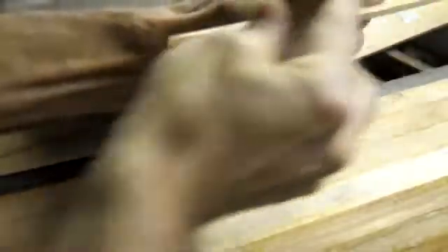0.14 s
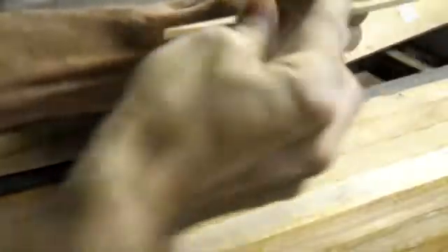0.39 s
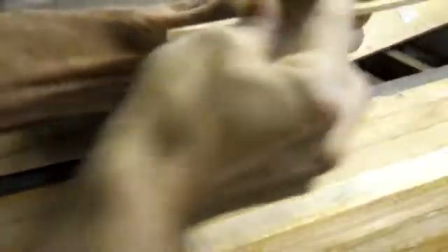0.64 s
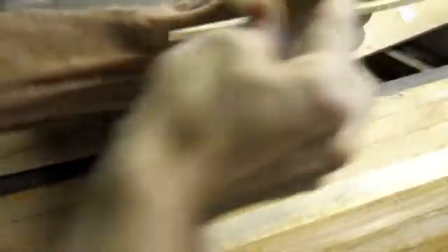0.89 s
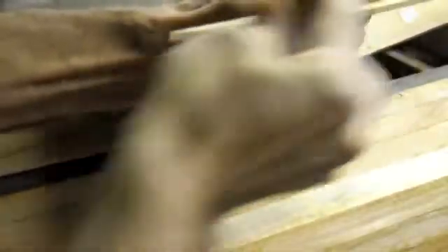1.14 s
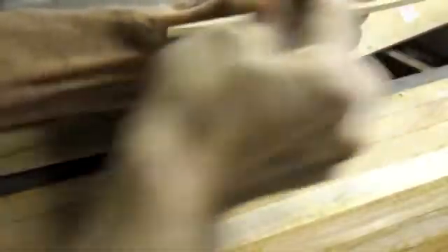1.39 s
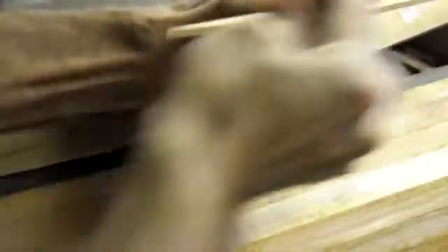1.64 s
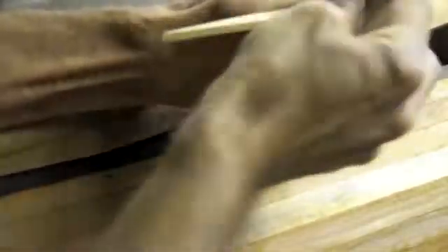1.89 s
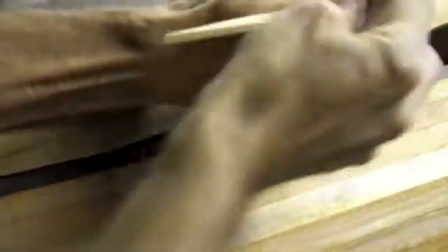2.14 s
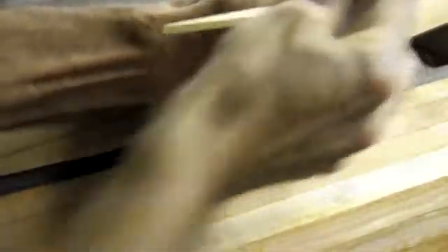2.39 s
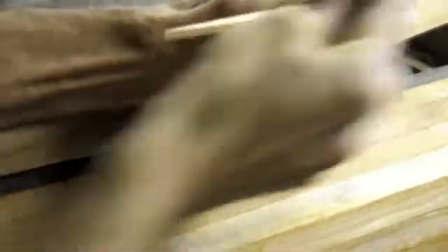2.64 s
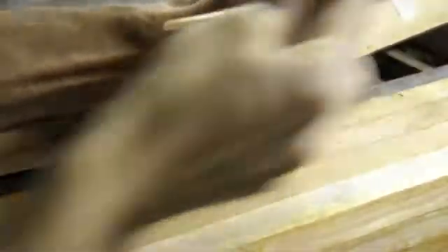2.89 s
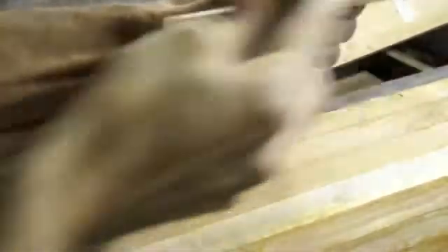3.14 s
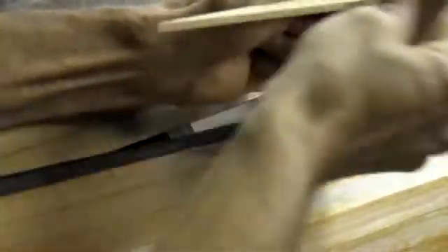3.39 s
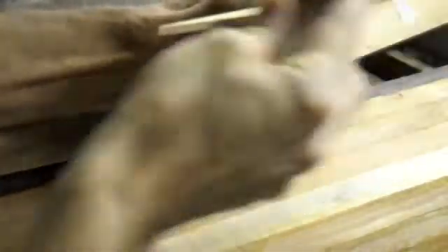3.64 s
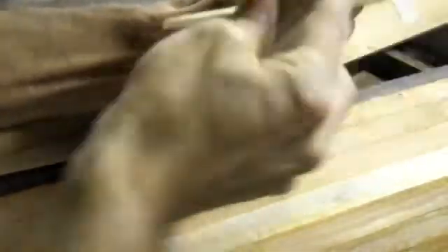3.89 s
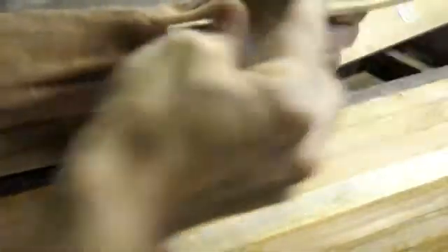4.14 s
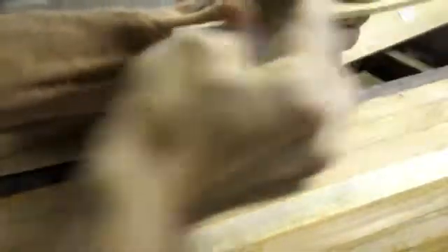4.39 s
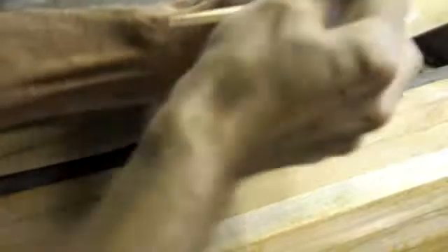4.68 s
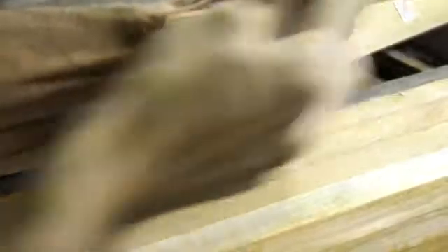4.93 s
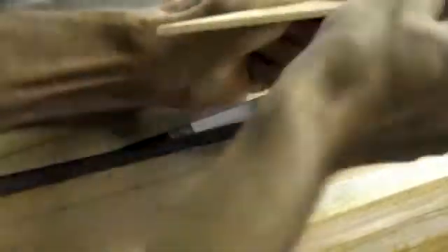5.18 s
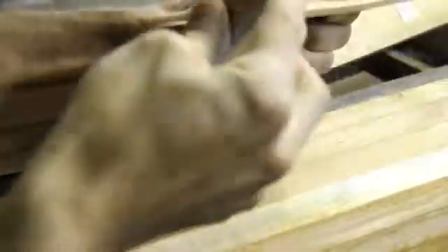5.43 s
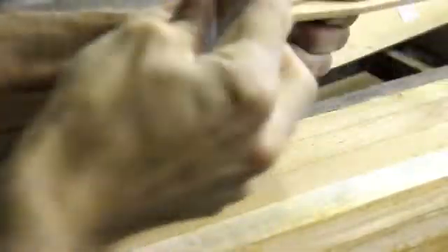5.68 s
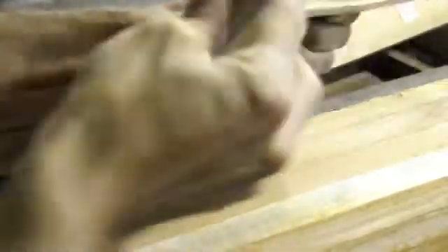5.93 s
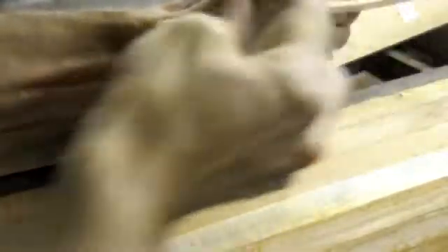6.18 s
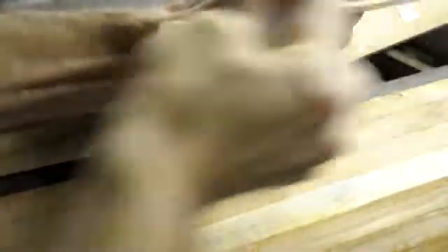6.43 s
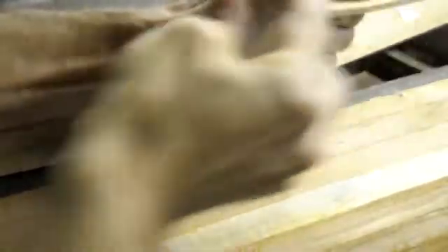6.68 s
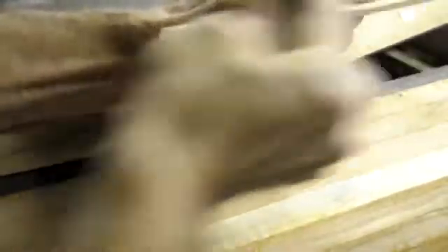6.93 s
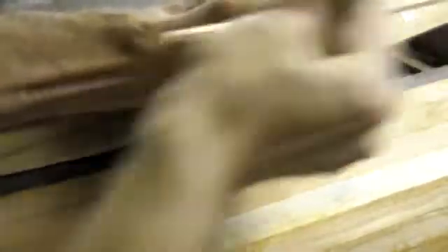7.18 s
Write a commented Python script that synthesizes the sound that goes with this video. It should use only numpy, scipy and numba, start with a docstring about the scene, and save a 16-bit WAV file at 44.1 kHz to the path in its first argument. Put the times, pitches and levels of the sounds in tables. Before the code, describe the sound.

Fast dry hand sanding on wood, about nine gritty strokes a second, with brief gaps and small hollow bumps in a workshop.

```python
"""Sandpaper on a wooden strip

In a workshop, folded sandpaper rubs to and fro along a thin strip held over a slatted bench.
Random grit catches make a hiss that follows hand speed and drive resonances of the strip and the boards.
Bumps ring the bench, soft wrist thumps ring one low mode, and the paper lands or bites as fading scuffs.
Decaying noise gives the room's echoes; coloured noise and a mains hum lie beneath, in a narrow microphone channel.
"""
import sys
import numpy as np
from scipy import signal
from scipy.fft import rfft, irfft
from scipy.io import wavfile
from scipy.ndimage import uniform_filter1d
from numba import njit

SR = 44100
rng = np.random.default_rng(int(sys.argv[2]) if len(sys.argv) > 2 else 0)


def store_pcm(level_fs):
    """Save levels as 16-bit WAV."""
    pcm = np.round(np.clip(level_fs, -1, 1) * 32767).astype(np.int16)
    wavfile.write(sys.argv[1], SR, np.atleast_2d(pcm).T)


def boost_factor(decibels):
    """Convert a level in decibels to a linear amplitude factor."""
    exponent = np.asarray(decibels, float) / 20
    return 10 ** exponent


N = 321930
TIME = np.arange(N) / SR


def rms_one(x):
    """Scale to an rms of 1."""
    return x / np.sqrt(np.mean(x ** 2) + 1e-20)


def cut(x, hz, kind):
    """Second-order low or high pass."""
    return signal.sosfilt(signal.butter(2, hz, kind, fs=SR, output="sos"), x)


def coloured(x, points):
    """Causal minimum-phase filter following a (f/Hz, level/dB) curve on a log axis."""
    curve_hz, curve_db = np.transpose(points)
    hz = np.linspace(0, SR / 2, 2049)
    db = np.interp(np.log(hz + 1), np.log(curve_hz), curve_db)
    cepstrum = irfft(db * np.log(10) / 20)
    cepstrum[1:2048] *= 2      # folding the cepstrum forward makes the response causal
    cepstrum[2049:] = 0
    response = irfft(np.exp(rfft(cepstrum)))
    return signal.fftconvolve(x, response)[:N]


def drift(rate):
    """Random wandering of rms 1: noise through two equal low passes at rate Hz."""
    r = np.exp(-2 * np.pi * rate / SR)
    wander = signal.lfilter([1], [1, -2 * r, r * r], rng.standard_normal(N + SR))
    return rms_one(wander[SR:])      # the first second lets the filter settle


def ring(force, hz, t60):
    """A damped mode: a unit click sets a sine of height 1 ringing."""
    r, w = boost_factor(-60 / (t60 * SR)), 2 * np.pi * hz / SR
    return signal.lfilter([0, np.sin(w)], [1, -2 * r * np.cos(w), r * r], force + 1e-18)


@njit
def gliding(x, turn, r):
    """Resonance whose centre moves sample by sample."""
    y = np.zeros_like(x)
    for i in range(2, len(x)):
        drive = (1 - r * r) / 2 * (x[i] - x[i - 2])
        y[i] = drive + r * turn[i] * y[i - 1] - r * r * y[i - 2]
    return y


# How bright the rubbed grit is before it is split into hiss, rumble and rings: f/Hz, level/dB
GRIT_COLOUR = [(88, -60), (150, -25.5), (292, -16), (361, -7), (551, -14.5), (870, -6), (943, -7),
               (1040, -6.5), (2230, -6), (3250, 0), (3640, 0.5), (5120, -4), (6230, -13), (7330, -15.5),
               (9530, -68), (16100, -120)]


def sanding():
    """One grain train feeds hiss, rumble, the strip's three rings and the bench."""
    middle = np.mean(np.array(STROKES)[:, :2], axis=1)
    *curves, stroke_rumble_db = stroke_colour(middle)
    ring_hz, ring_db, upper_hz, upper_db, shake_db = (np.interp(TIME, middle, c) for c in curves)
    speed, rumble_db = hand_speed(stroke_rumble_db)

    grains = grit(per_s=16000, spread_db=2.5)
    rasp = coloured(grains, GRIT_COLOUR)
    rumble_top_hz = 1750
    hiss = boost_factor(-6.5) * rms_one(cut(rasp, rumble_top_hz, "high"))
    rumble = boost_factor(rumble_db) * rms_one(cut(rasp, rumble_top_hz, "low"))

    usual_speed = uniform_filter1d(speed, size=SR // 8)
    pace = (speed / (usual_speed + 0.0011)) ** 0.77      # the ring sings out at top speed
    main_ring = pace * boost_factor(ring_db) * strip_ring(rasp, ring_hz, width_hz=910)
    upper_ring = boost_factor(upper_db) * strip_ring(rasp, upper_hz, width_hz=550)
    low_ring = boost_factor(-23.5 + 5.5 * drift(16)) * strip_ring(rasp, 1584, width_hz=600)
    strip = main_ring - upper_ring - low_ring
    return speed * (hiss - rumble + strip) + bench(grains * speed * boost_factor(shake_db))


def grit(per_s, spread_db):
    """Grains catch and let go at random, in clumps as the paper chatters."""
    sizes = boost_factor(spread_db * np.minimum(rng.exponential(1, N), 5)) * rng.choice([-1, 1], N)
    catches = rng.random(N) < per_s / SR
    chatter = boost_factor(1.1 * drift(160))
    return rms_one(sizes * catches * chatter)


# Each rub of the hand: start t/s, end t/s, top hand-speed level/dB
STROKES = [(-0.026, 0.102, -24.5), (0.094, 0.226, -21), (0.242, 0.35, -19), (0.363, 0.479, -17.5),
           (0.503, 0.612, -18), (0.611, 0.727, -18.5), (0.741, 0.874, -18), (1.127, 1.23, -26.5),
           (1.227, 1.345, -26), (1.369, 1.469, -24), (1.478, 1.581, -22.5), (1.595, 1.692, -22.5),
           (1.702, 1.813, -21), (1.823, 1.933, -22.5), (1.93, 2.042, -21), (2.053, 2.159, -23.0),
           (2.164, 2.268, -21), (2.279, 2.399, -24), (2.4, 2.509, -20.5), (2.527, 2.624, -22.5),
           (2.63, 2.756, -24), (2.752, 2.883, -24), (2.877, 3.001, -21), (3.008, 3.126, -22.5),
           (3.12, 3.237, -21), (3.263, 3.347, -20), (3.364, 3.478, -21), (3.485, 3.597, -22.5),
           (3.611, 3.712, -19), (3.728, 3.836, -22), (3.834, 3.949, -19.5), (3.954, 4.063, -21),
           (4.077, 4.175, -18.5), (4.204, 4.297, -22), (4.302, 4.418, -21.5), (4.421, 4.539, -23.5),
           (4.536, 4.648, -21.5), (4.659, 4.761, -24), (4.757, 4.897, -20.5), (5.204, 5.353, -24),
           (5.363, 5.471, -23.5), (5.473, 5.577, -20.5), (5.594, 5.711, -23), (5.701, 5.814, -21),
           (5.826, 5.939, -23.5), (5.933, 6.048, -21.5), (6.048, 6.163, -24.5), (6.161, 6.27, -21),
           (6.271, 6.385, -24), (6.376, 6.498, -24), (6.497, 6.617, -25), (6.609, 6.746, -23),
           (7.061, 7.181, -26.5), (7.194, 7.304, -25.5)]
# The paper lands or bites at a turn:
# t/s, hand-speed level/dB, 60 dB fade t/s, wood rumble drive level/dB
TOUCHES = [(0.965, -38.5, 0.08, -7), (0.979, -50, 0.056, 4), (1.119, -30.5, 0.049, 2.5),
           (1.362, -26, 0.11, -9), (1.483, -26.5, 0.15, -5), (2.664, -23.5, 0.022, -10),
           (3.254, -17, 0.069, -12), (3.373, -31, 0.12, -4.5), (3.611, -24.5, 0.069, -9),
           (4.081, -27.5, 0.086, -7.5), (4.196, -16, 0.064, -13.5), (5.186, -36.5, 0.087, 5.5),
           (7.061, -38.5, 0.12, -2)]


def hand_speed(stroke_rumble_db):
    """Each stroke is a leaning half sine and each touch a fading scuff; both set the wood's rumble."""
    lean, peakedness = (0.46, 0.62), 0.99      # share of the stroke at top speed (pull, push); exponent
    landing_s = .005
    speed, rumble_db = np.zeros(N), np.zeros(N)
    for (start, end, db), push, low_db in zip(STROKES, pushes(), stroke_rumble_db):
        span = slice(max(round(start * SR), 0), round(end * SR))
        part = np.clip((TIME[span] - start) / (end - start), 0, 1)
        part = part ** (np.log(.5) / np.log(lean[push]))
        speed[span] += boost_factor(db) * np.abs(np.sin(np.pi * part)) ** peakedness
        rumble_db[span.start:] = low_db
    for s, db, t60, low_db in TOUCHES:
        at = round(s * SR)
        after = TIME[:N - at]
        fade = boost_factor(db - 60 * np.minimum(after / t60, 4))
        speed[at:] += fade * np.minimum(after / landing_s, 1)
        rumble_db[at:at + round(t60 * SR / 4)] = low_db
    return speed, uniform_filter1d(rumble_db, size=400)


# First direction of each bout of strokes: 1 push, 0 pull
OPENS_WITH_PUSH = (0, 0, 1, 1)


def pushes():
    """1 for a push, 0 for a pull: the direction alternates within a bout."""
    pause_s = .15      # a longer gap opens a new bout
    start, end, _ = np.transpose(STROKES)
    opens = np.r_[True, start[1:] - end[:-1] > pause_s]
    count = np.arange(len(start))
    first = np.maximum.accumulate(count * opens)
    opening = np.array(OPENS_WITH_PUSH)[np.cumsum(opens) - 1]
    return (opening + count - first) % 2


# Grip on the strip while pushing, before pull and scatter:
# t/s, main ring f/Hz, main ring level/dB, upper ring f/Hz, upper ring level/dB
GRIP = [(0.1, 2714, -4.5, 4580, -8.5), (0.6, 2840, -10, 4710, -6), (0.85, 2624, -3, 4330, -8),
        (1.2, 2890, -7.5, 4290, -11), (1.6, 2974, -11.5, 3890, -7), (2.1, 2930, -6, 3890, -9),
        (2.6, 2940, -7.5, 4200, -7), (3.3, 2990, -8, 3870, -8), (4.0, 3040, -9.5, 4170, -7),
        (4.6, 2960, -15, 4380, -3.5), (5.3, 3076, -5.5, 3950, -7.5), (5.7, 3046, -5.5, 4020, -6.5),
        (6.1, 3240, -14, 3860, -6), (6.7, 3230, -17, 4480, -6.5), (7.15, 3100, -12, 4190, -7.5)]
# How firmly the work bears on the bench while pushing, before pull:
# t/s, wood rumble drive level/dB, bench shake drive level/dB
BEARING = [(0.05, -5, -10.5), (0.4, -11.5, -35.5), (0.8, -10.5, -17), (1.2, -5, -19.5),
           (1.75, -11.5, -25.5), (2.3, -7, -18.5), (3.1, -12, -22.5), (3.5, -8.5, -22.5), (4.2, -9, -20),
           (4.8, -8, -17.5), (5.3, -10.5, -25.5), (5.55, -7, -19), (6.1, -7.5, -16.5), (6.7, -10, -16.5),
           (7.15, -11.5, -21)]
# A pull presses less; change from a push: main ring, upper ring, rumble, shake, each level/dB
PULL_CHANGE = (-7, -2.5, -2.5, -6)


def stroke_colour(middle):
    """Slow grip and bearing curves per stroke, changed on pulls, with the ring levels scattered."""
    ring_hz, ring_db, upper_hz, upper_db = along(GRIP, middle)
    rumble_db, shake_db = along(BEARING, middle)
    pull = 1 - pushes()
    scatter_db = 1.3 * rng.normal(0, 1, (len(middle), 2))
    ring_hz = ring_hz * 1.04 ** pull      # the main ring sits a little higher on a pull
    ring_db = ring_db + PULL_CHANGE[0] * pull + scatter_db[:, 0]
    upper_db = upper_db + PULL_CHANGE[1] * pull + scatter_db[:, 1]
    rumble_db = rumble_db + PULL_CHANGE[2] * pull
    shake_db = shake_db + PULL_CHANGE[3] * pull
    return ring_hz, ring_db, upper_hz, upper_db, shake_db, rumble_db


def along(rows, s):
    """The columns of a curve at times s."""
    times, *columns = np.transpose(rows)
    return [np.interp(s, times, c) for c in columns]


def strip_ring(rasp, hz, width_hz):
    """Two passes through a wandering resonance keep its flanks steep; rms 1."""
    wander = 1 + .025 * drift(25)      # fingers shift the free length
    turn = 2 * np.cos(2 * np.pi * hz * wander / SR)
    r = np.exp(-np.pi * width_hz / SR)
    return rms_one(gliding(gliding(rasp, turn, r), turn, r))


# The hand bumps the bench: t/s, blow level/dB, level/dB added to boards above 550 Hz
BUMPS = [(0.052, -38.5, 25.5), (0.178, -40.5, 23), (0.216, -34.5, 19), (1.516, -26, 6), (1.96, -32.5, -9),
         (2.222, -32.5, -12), (2.448, -36.5, -1), (2.682, -35, -2), (2.926, -30, -9), (3.037, -25.5, -11),
         (3.402, -22.5, 8.5), (3.502, -32, -9), (3.646, -25, -11), (3.879, -24.5, -8), (4.114, -23, -11),
         (4.214, -26.5, -19), (4.355, -31, -12), (4.593, -27, 4), (4.81, -31, -4), (5.309, -30.5, 16),
         (5.523, -22, -12), (5.605, -27.5, -8), (5.757, -21.5, 16), (5.981, -22, 8), (6.069, -33, 12),
         (6.207, -22, 9), (6.433, -28, -11)]
# Modes of the bench boards: f/Hz, drive level/dB, 60 dB decay t/s
BOARDS = [(245, -15, .1), (368, -2, .14), (420, -1, .12), (505, -13, .07), (610, -10, .05), (695, -8, .06),
          (760, -12, .05), (885, -11, .09), (1040, -11, .07), (1190, -12, .07), (1350, -13, .08),
          (1490, -12, .07)]


def bench(shake):
    """The boards ring from the rubbing and from each bump, with new mode strengths per bump."""
    knuckle_hz, scatter_db = 700, 1.5      # softness of the blow, spread of mode strength
    s, blow_db, upper_db = np.transpose(BUMPS)
    chance = rng.normal(0, 1, (len(s), len(BOARDS)))
    out = np.zeros(N)
    for k, (hz, db, t60) in enumerate(BOARDS):
        blows = np.zeros(N)
        mode_db = blow_db + db + upper_db * (hz > 550) + scatter_db * chance[:, k]
        blows[(s * SR).astype(int)] = boost_factor(mode_db)
        soft_blows = cut(cut(blows, knuckle_hz, "low"), knuckle_hz, "low")
        steady = shake * boost_factor(db) / np.sqrt(t60 * SR / (4 * np.log(1000)))      # evened for ring time
        out += (-1) ** k * ring(soft_blows + steady, hz, t60)
    return cut(out, 250, "high")      # narrow slats radiate no deep bass


# Soft wrist thumps: t/s, push level/dB before softening, mode f/Hz
THUMPS = [(1.739, -47, 162), (2.343, -39, 163), (5.093, -34, 153)]


def thumps():
    """A padded push rings one low, short mode."""
    out = np.zeros(N)
    for s, db, hz in THUMPS:
        push = boost_factor(db) * (np.arange(N) == round(s * SR))
        padded = cut(cut(push, 220, "low"), 100, "high")
        out += ring(padded, hz, t60=.1)
    return out


def workshop(x):
    """Dense echoes: noise that starts after the first wall and dies away, the treble sooner."""
    after = TIME[:SR // 2]
    noise = rng.standard_normal(SR // 2)
    dull = cut(noise, 1800, "low")
    bright = noise - dull
    dull_t60_s, bright_t60_s, bright_db = 0.31, 0.23, -2
    echoes = dull * boost_factor(-60 * after / dull_t60_s) + bright * boost_factor(bright_db - 60 * after / bright_t60_s)
    echoes = echoes * np.clip(after / 0.024 - .5, 0, 1)      # silent for 12 ms, full at 36 ms
    return signal.fftconvolve(x, echoes / np.sqrt(np.sum(echoes ** 2)))[:N]


# Colour of the room's noise floor: f/Hz, relative level/dB
FLOOR_COLOUR = [(30, -25.5), (75, -14), (160, -16.5), (240, -8.5), (400, -9.5), (520, -1.5), (700, -10.5),
                (1500, -18.5), (2070, -16), (3300, -24), (4100, -14.5), (4450, -15), (4900, -24),
                (6600, -34), (7400, -53.5), (9500, -88)]


def background():
    """Room noise and a mains hum, both wavering slightly in level."""
    floor_db, hum_hz, hum_db = -48, 58.4, -66      # mean levels: floor rms, hum peak
    noise = rms_one(coloured(rng.standard_normal(N), FLOOR_COLOUR))
    hum = np.sin(2 * np.pi * hum_hz * TIME)
    return boost_factor(floor_db + 1.0 * drift(5.4)) * noise + boost_factor(hum_db + .7 * drift(4)) * hum


def scene():
    """The work, its echoes 12 dB down through the room, and the floor beneath, in mono."""
    work = sanding() + thumps()
    return (work + boost_factor(-12) * workshop(work) + background())[None]


def roll_off(x):
    """The treble ends steeply here."""
    return signal.sosfilt(signal.butter(12, 7480, fs=SR, output="sos"), x)


def record(dry):
    """A narrow microphone channel: the bass is cut and the top rolls off steeply."""
    no_bass = cut(dry, 28, "high")
    steep_top = signal.cheby2(10, 60, 7900, fs=SR, output="sos")      # 60 dB down from 7900 Hz
    narrow = signal.sosfilt(steep_top, no_bass)
    return roll_off(narrow)


dry = scene()
out = record(dry)
store_pcm(out)
```